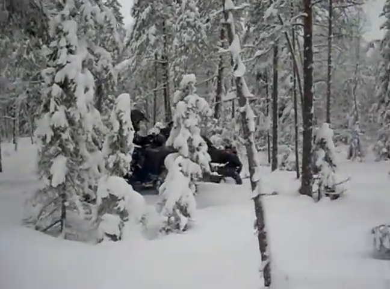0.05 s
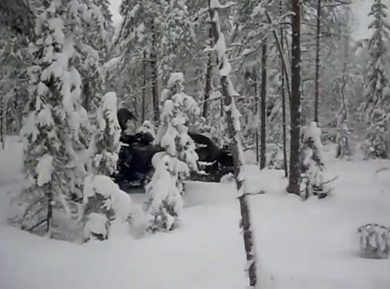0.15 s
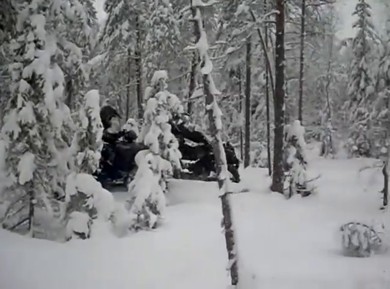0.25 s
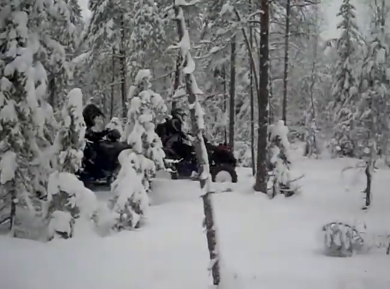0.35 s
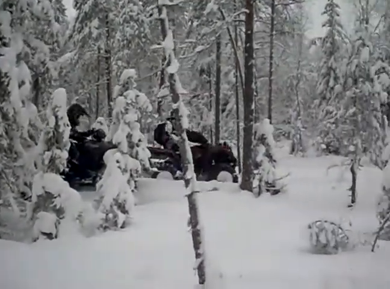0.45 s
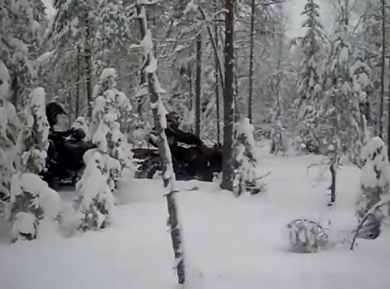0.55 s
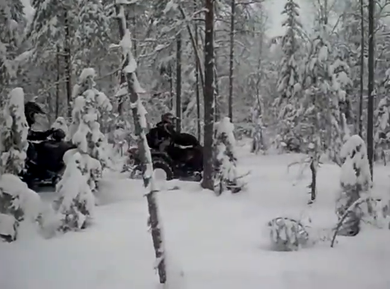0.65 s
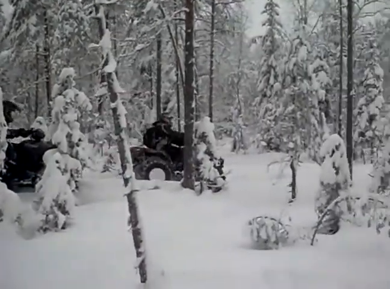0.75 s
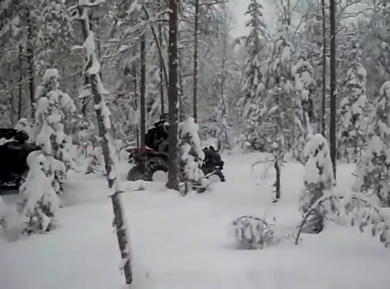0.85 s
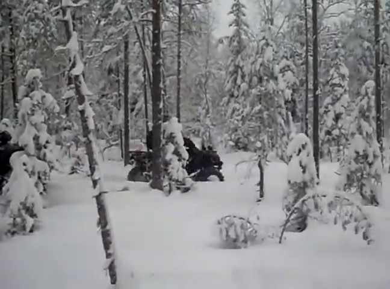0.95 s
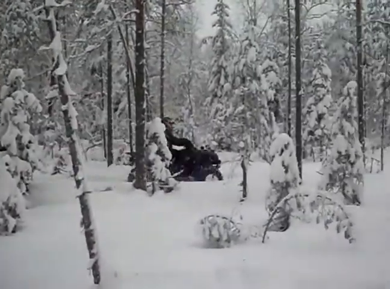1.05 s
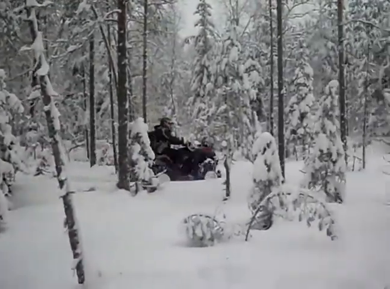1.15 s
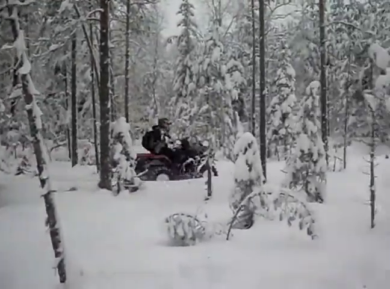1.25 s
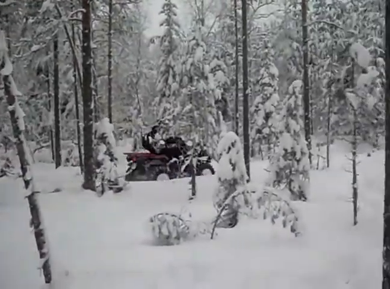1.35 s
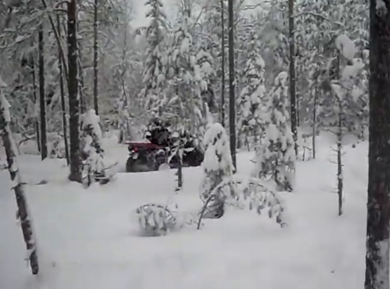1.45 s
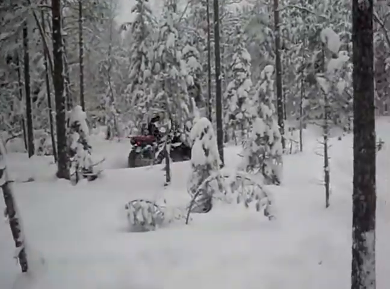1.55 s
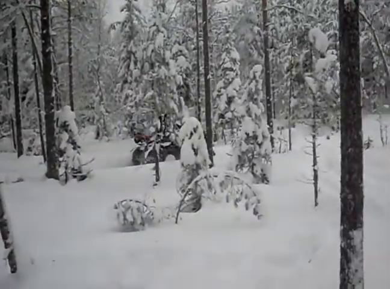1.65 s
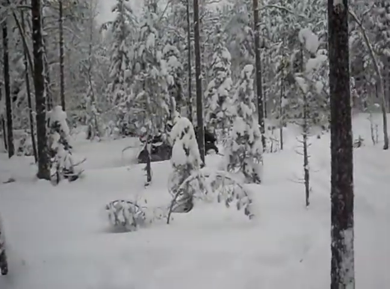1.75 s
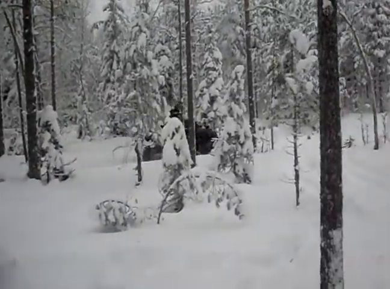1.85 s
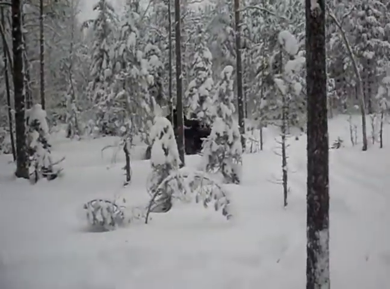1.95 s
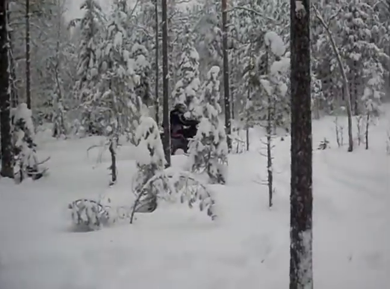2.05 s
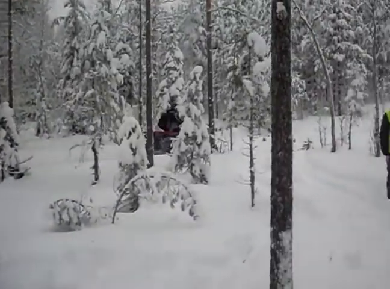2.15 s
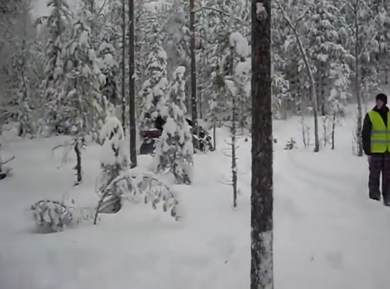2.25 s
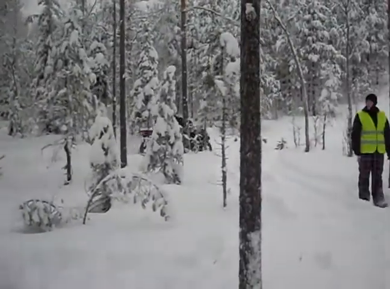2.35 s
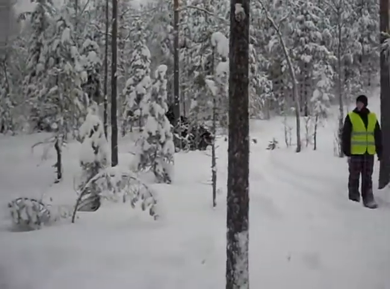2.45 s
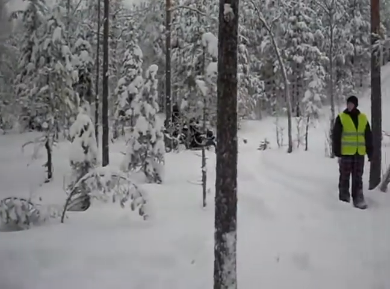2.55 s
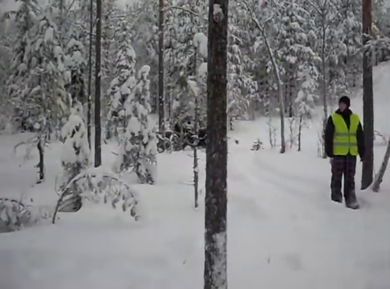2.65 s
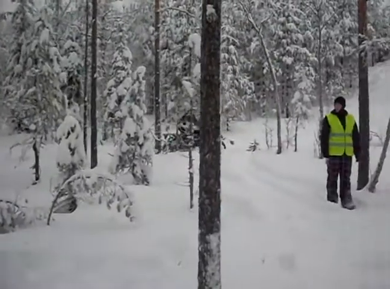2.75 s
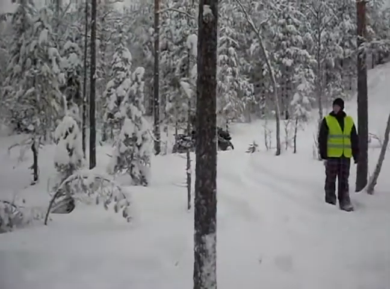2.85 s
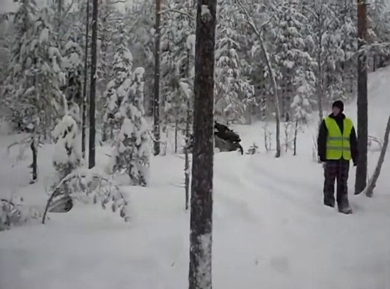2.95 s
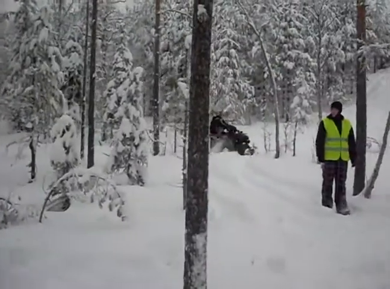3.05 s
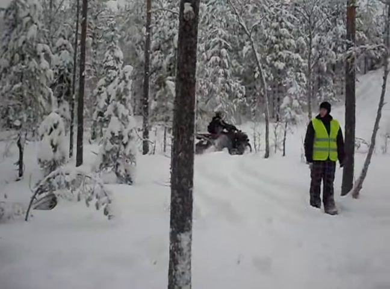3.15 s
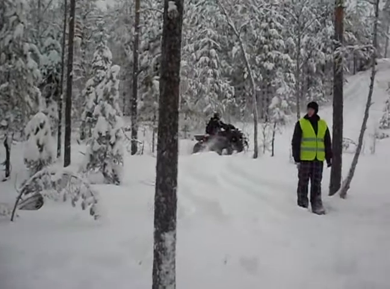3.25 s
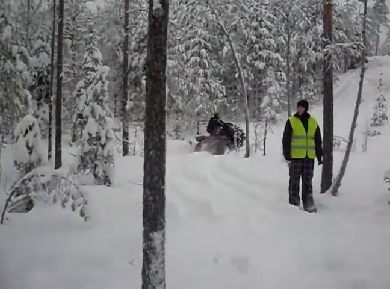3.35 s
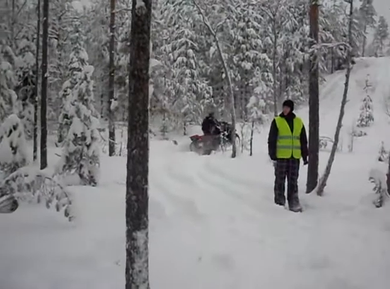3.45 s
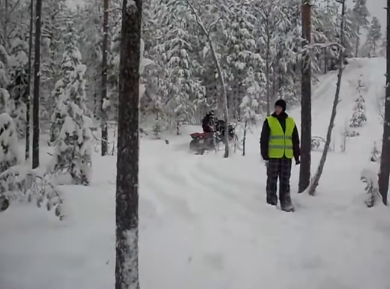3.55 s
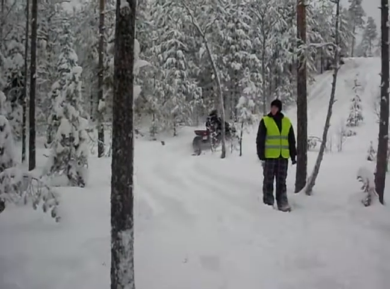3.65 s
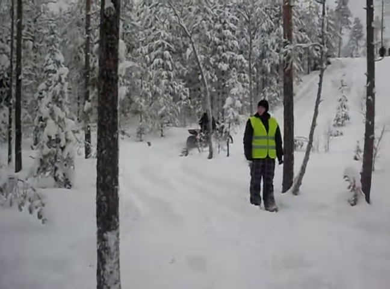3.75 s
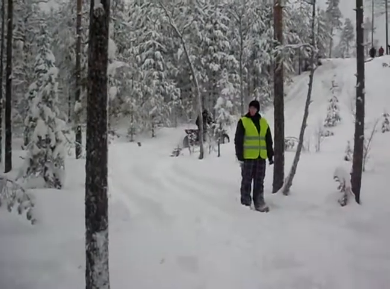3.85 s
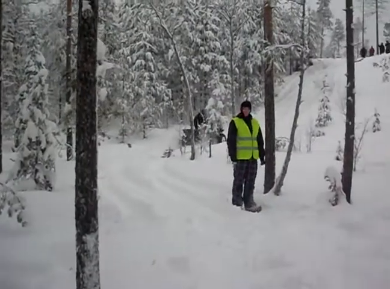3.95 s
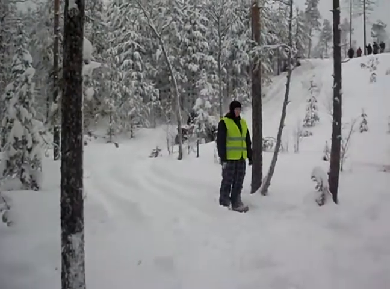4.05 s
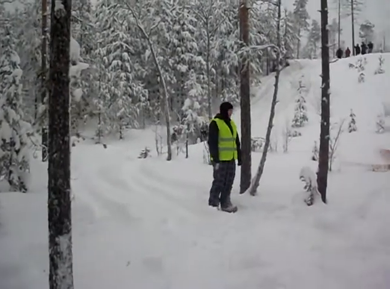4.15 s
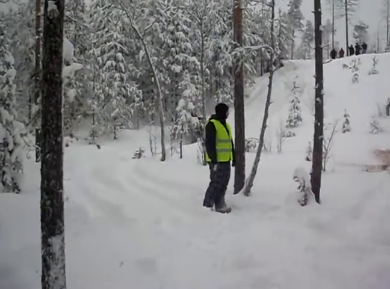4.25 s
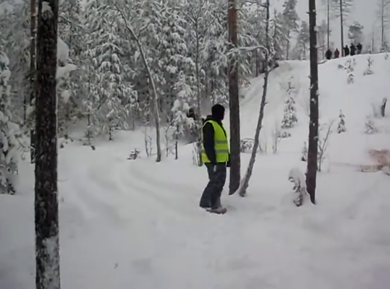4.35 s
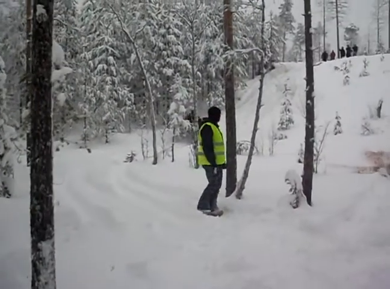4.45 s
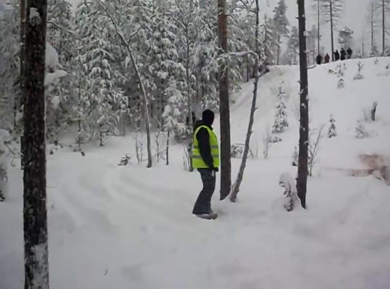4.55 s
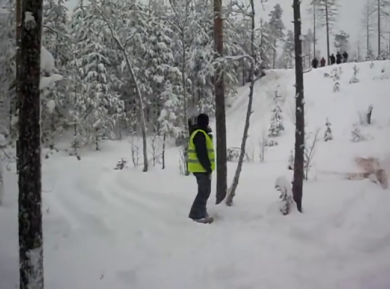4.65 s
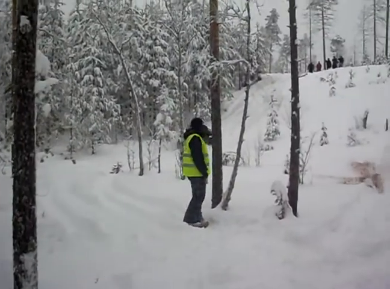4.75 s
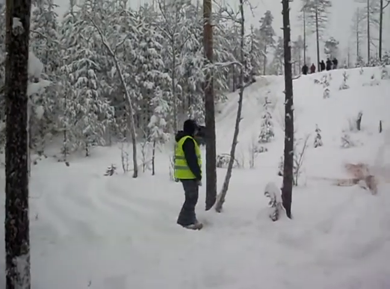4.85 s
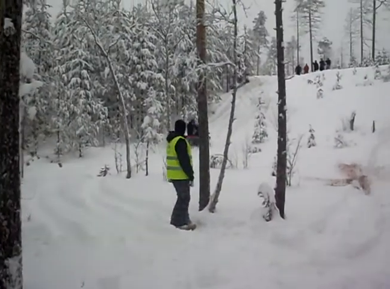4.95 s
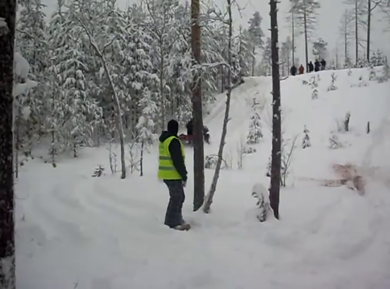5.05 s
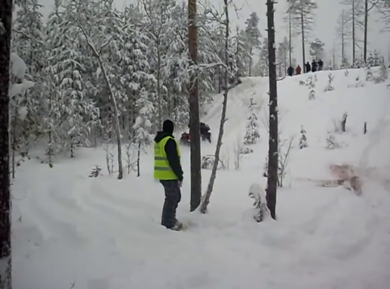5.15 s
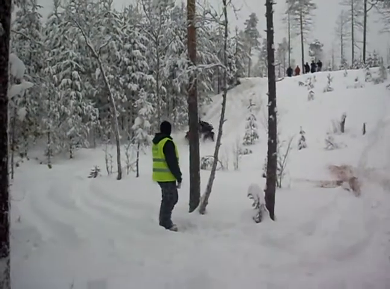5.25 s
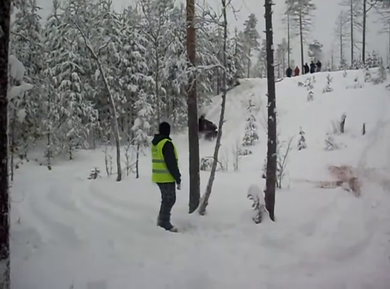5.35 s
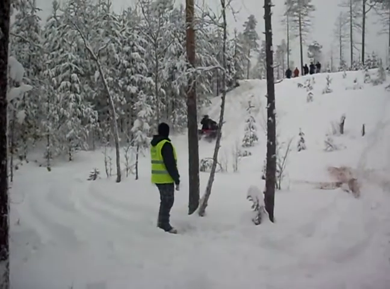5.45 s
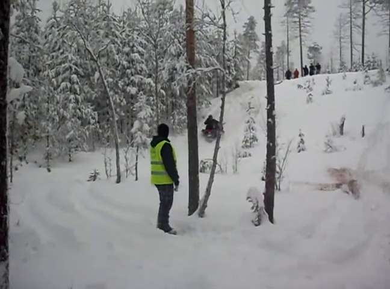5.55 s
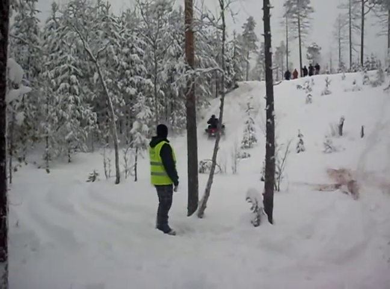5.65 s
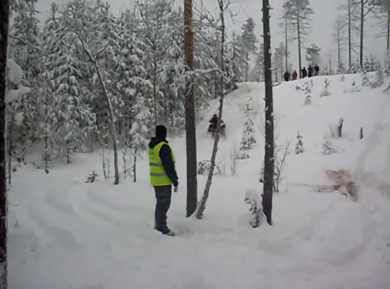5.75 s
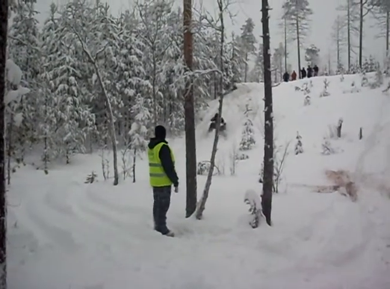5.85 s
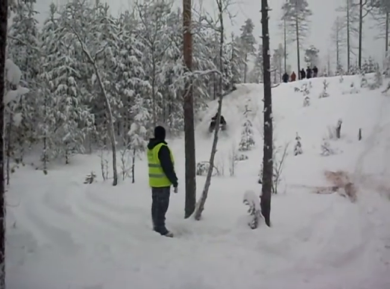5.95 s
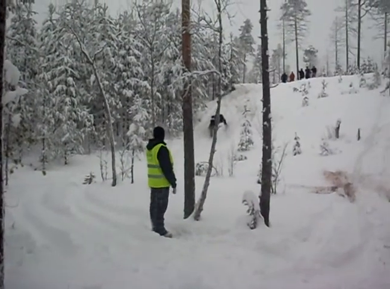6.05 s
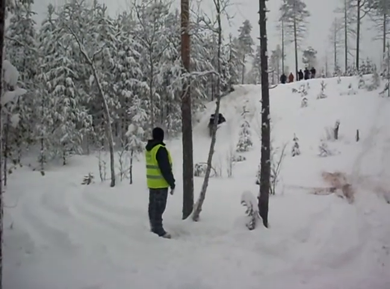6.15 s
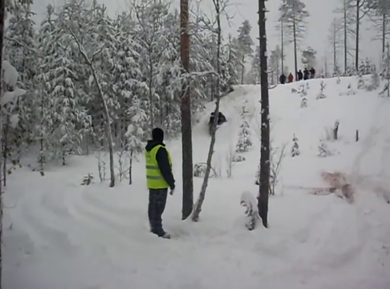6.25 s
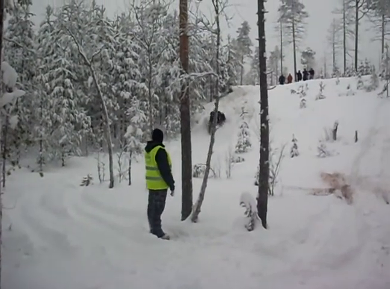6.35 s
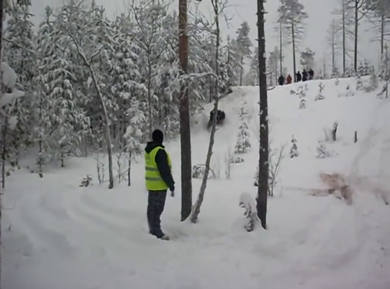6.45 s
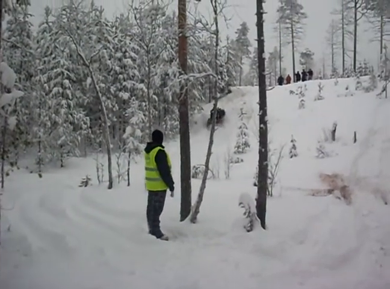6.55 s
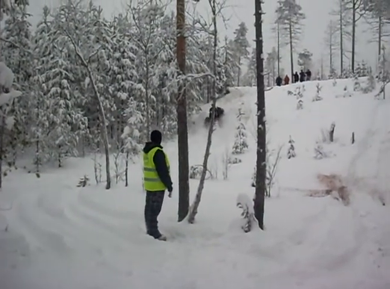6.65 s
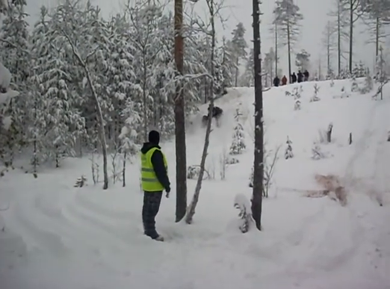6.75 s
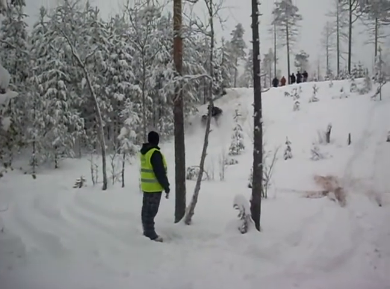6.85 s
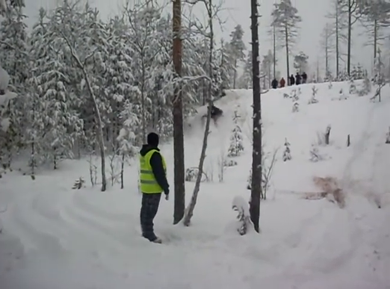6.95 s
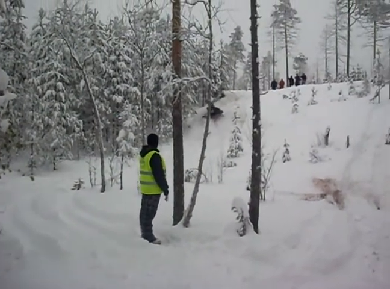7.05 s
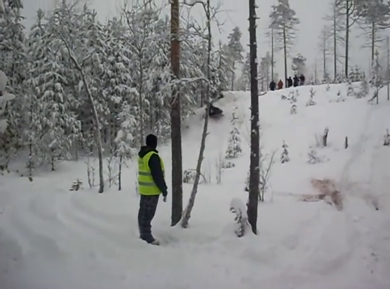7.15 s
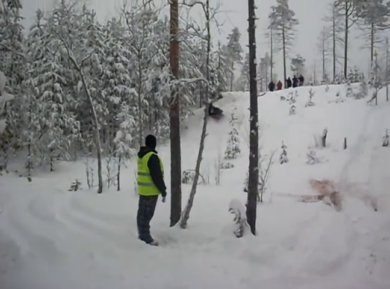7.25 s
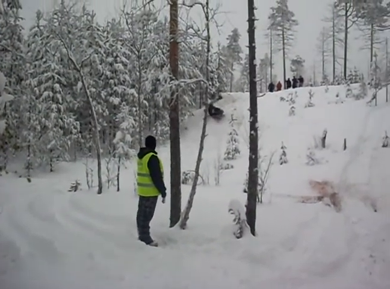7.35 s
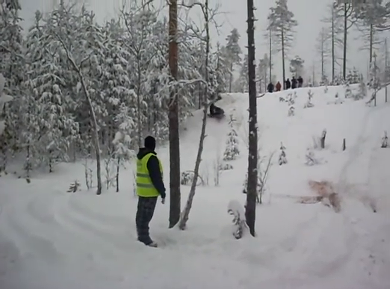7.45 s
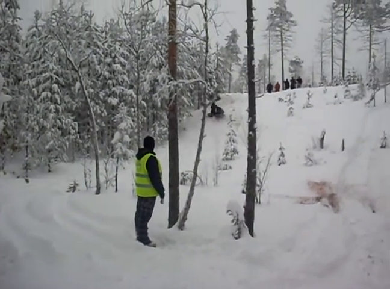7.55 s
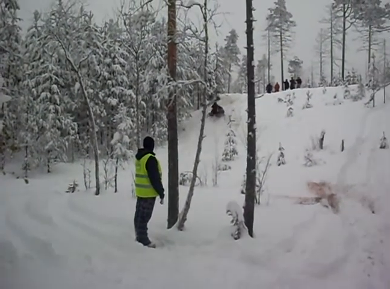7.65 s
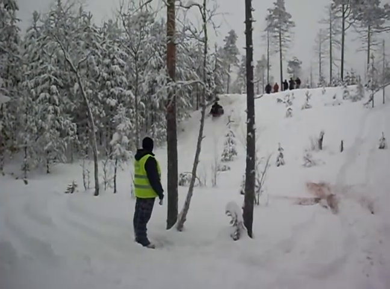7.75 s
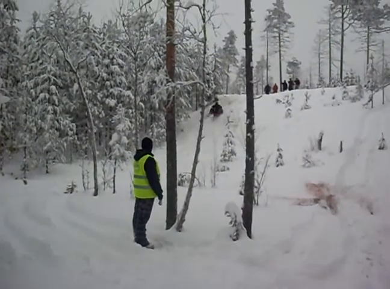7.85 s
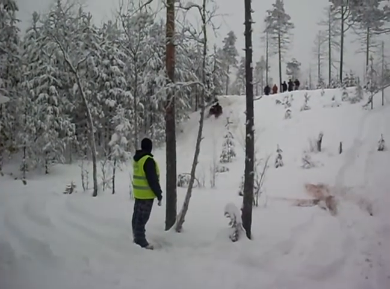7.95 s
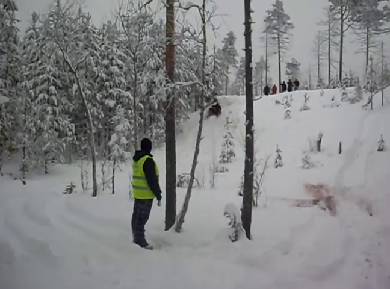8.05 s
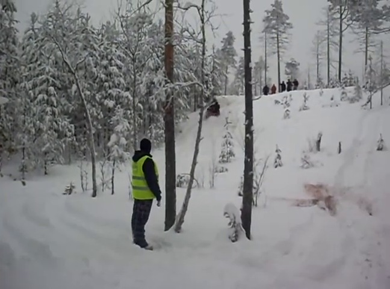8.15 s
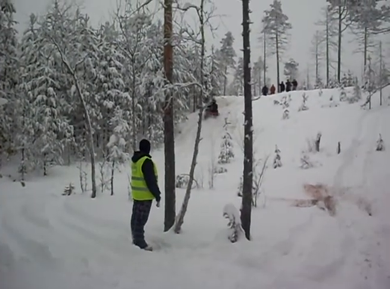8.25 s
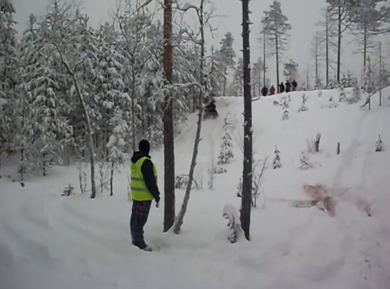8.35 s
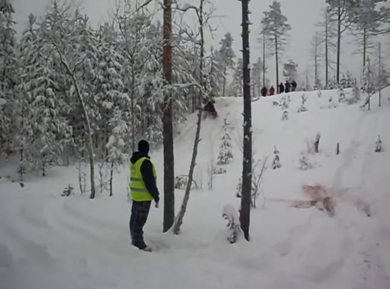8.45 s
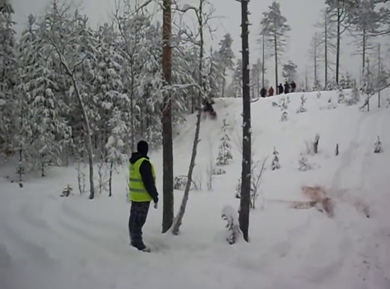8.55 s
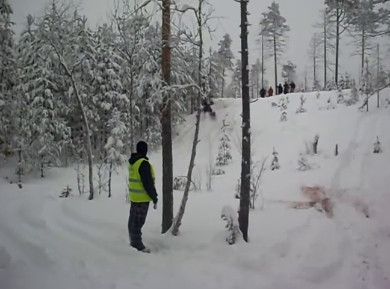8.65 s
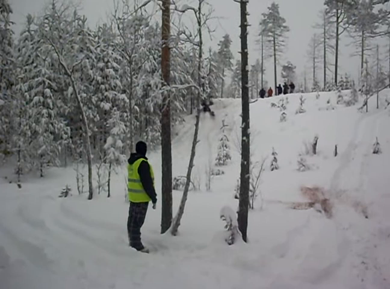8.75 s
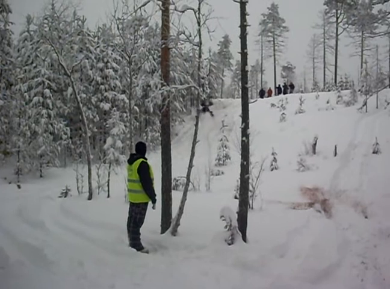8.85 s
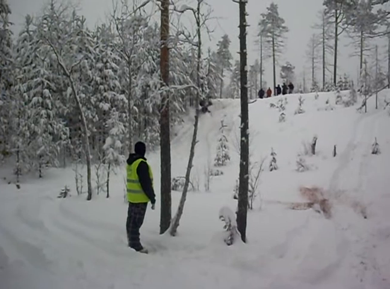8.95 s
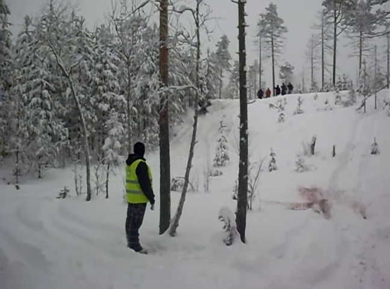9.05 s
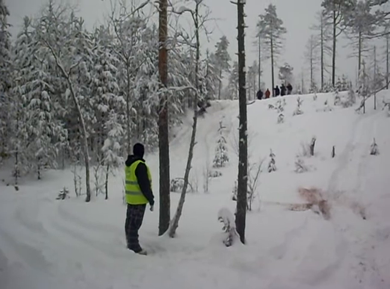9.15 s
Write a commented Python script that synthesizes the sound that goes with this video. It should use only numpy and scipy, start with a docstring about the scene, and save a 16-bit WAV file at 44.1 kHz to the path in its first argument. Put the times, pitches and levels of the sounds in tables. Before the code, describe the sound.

A quad bike churns through snow with a low, hollow note, then opens to full throttle and climbs, rasping and snarling.

```python
"""First comes the low, hollow note of a V-twin quad bike churning through deep snow in a forest.
It turns away from the microphone and climbs a hill on full throttle, rasping and snarling.
Its two cylinders fire in close pairs; the revs hunt as the wheels slip; the slope mirrors the exhaust.
Behind it another quad idles among the trees, a third drones far off, and bright ticks cut through."""
import sys
import numpy as np
from scipy import signal
from scipy.fft import rfft, irfft, next_fast_len
from scipy.io import wavfile
from scipy.ndimage import uniform_filter1d, map_coordinates

SR = 44100
rng = np.random.default_rng(int(sys.argv[2]) if len(sys.argv) > 2 else 0)


def unload_audio(sound):
    """Save the sound as a 16-bit wav file, at the path given as the first command line argument."""
    columns = np.transpose(np.atleast_2d(sound))
    # keep every value between -1 and 1, then stretch to whole-number steps
    steps = np.round(np.clip(columns, -1, 1) * 32767)
    wavfile.write(sys.argv[1], SR, steps.astype(np.int16))


N = 406150
TIME = np.arange(N) / SR
KICK_S, OPEN_S, CRUISE_THROTTLE = 4.418, .06, .15  # the throttle snaps open: when, how fast, from where
CLIMB_S = np.maximum(TIME - KICK_S, 0)
THROTTLE = 1 - (1 - CRUISE_THROTTLE) * np.exp(-CLIMB_S / OPEN_S)
SPIT = (1 - np.exp(-CLIMB_S / .008)) * np.exp(-CLIMB_S / .085)  # it spits before the revs follow


def amp(db):
    """Decibels to amplitude."""
    return 10 ** (np.asarray(db) / 20)


def unit(x):
    """Scale to rms 1."""
    return x / np.sqrt(np.mean(x ** 2) + 1e-20)


def steady(x, size=4400):
    """Hold the running rms at 1."""
    return x / np.sqrt(np.abs(uniform_filter1d(uniform_filter1d(x ** 2, size), size)) + 1e-20)


def curves(rows):
    """One value per sample for each column after the time."""
    s, *cols = np.transpose(rows)
    return [np.interp(TIME, s, c) for c in cols]


def swells(rows):
    """Sum of smooth bumps, one for each (time [s], height, half length [s]) row."""
    return sum(height * np.exp(-((TIME - s) / half) ** 2) for s, height, half in rows)


def wobble(rate):
    """A smooth random curve, rate knots a second."""
    return map_coordinates(rng.standard_normal(int(N * rate / SR) + 4), [TIME * rate])


def colour(x, points, size=8192):
    """Causal filter through the (frequency [Hz], gain [dB]) points."""
    f, db = np.transpose(points)
    gain = amp(np.interp(np.log(np.fft.rfftfreq(size, 1 / SR) + 1), np.log(f), db))
    cepstrum = irfft(np.log(gain))
    cepstrum[1:size // 2] *= 2
    cepstrum[size // 2 + 1:] = 0
    return signal.oaconvolve(x, irfft(np.exp(rfft(cepstrum))))[:N]


def below(x, hz, order=8):
    """Low-pass without phase shift."""
    m = next_fast_len(N + 8192)
    return irfft(rfft(x, m) / (1 + (np.fft.rfftfreq(m, 1 / SR) / hz) ** order), m)[:N]


def delayed(x, ms):
    """x heard ms later; ms may move."""
    return np.interp(TIME - ms / 1000, TIME, x, left=0)


def firings(cycles, scatter_db, jitter_s):
    """One impulse at each whole cycle, uneven in size and time."""
    when = np.interp(np.arange(np.ceil(cycles[0]), cycles[-1]), cycles, TIME)
    chance = rng.standard_normal((len(when), 2))
    at = np.clip(np.round((when + jitter_s * chance[:, 0]) * SR), 0, N - 1).astype(int)
    return np.bincount(at, amp(scatter_db * chance[:, 1]), N)


def puffs(pulses, decay_s, rise_s, between, size=1500):
    """Noise that flares at each pulse and dies away to a steady share."""
    t = np.arange(size) / SR
    shape = np.exp(-t / decay_s) * (1 - np.exp(-(t / rise_s) ** 2))
    return (signal.oaconvolve(pulses, shape / shape.max())[:N] + between) * rng.standard_normal(N)


# the air among the trees: (frequency [Hz], gain [dB])
AIR_SPECTRUM = [(20, -2), (100, -5), (300, -8), (650, -3.5), (1300, -6), (2300, -7.5), (4500, -22),
                (10000, -30), (12000, -58)]

def forest_air():
    """A soft, nearly even rush all round the microphone."""
    return amp(-44.3 + .2 * wobble(3.9)) * unit(colour(rng.standard_normal(N), AIR_SPECTRUM))


def far_quad():
    """Far off, an engine's wavering drone comes into earshot after the first second."""
    pitch_hz = 123 + 3 * wobble(6.2)
    drone = np.sin(2 * np.pi * np.cumsum(pitch_hz) / SR) * amp(3 * wobble(7))
    return amp(-53) * unit(drone) * np.clip(TIME - 1, 0, 1)


# one idling exhaust thump: (frequency [Hz], gain [dB])
IDLE_THUMP = [(20, -26), (45, 4), (70, -1), (115, 9), (180, -9.5), (300, -8.5), (800, -50), (3000, -50)]

def idling_quad():
    """Among the trees, a waiting engine fires in dull, uneven thumps."""
    firing_hz = 24 + .8 * wobble(3)
    thumps = firings(np.cumsum(firing_hz) / SR, scatter_db=3, jitter_s=.0021)
    return amp(-49.5) * unit(colour(thumps, IDLE_THUMP))


# sharp ticks: (time [s], relative level [dB])
TICK_EVENTS = [(6.1467, -9), (6.3071, -18), (7.416, -3), (8.335, -14), (9.1696, -12)]

def ticks(size=900):
    """Brief noise bursts, as of twigs snapping, as bright as the exhaust's hiss."""
    out, t = np.zeros(N + size), np.arange(size) / SR
    for s, db in TICK_EVENTS:
        out[round(s * SR):][:size] += amp(db - 20.5) * np.exp(-t / .002) * rng.standard_normal(size)
    return colour(out[:N], HISS_SPECTRUM)


def forest_echo(x, t60, size=22050):
    """Snowy trunks scatter a short, dull echo back to the microphone."""
    t = np.arange(size) / SR
    tail = rng.standard_normal(size) * amp(-60 * t / t60) * (1 - np.exp(-t / .045))
    return below(signal.fftconvolve(x, tail / np.linalg.norm(tail))[:N], hz=4300, order=2)


def scattered(pulses, decay_s, rate, count=4, size=500):
    """Each pulse returns as a dense cluster that changes slowly as the quad moves among the trunks."""
    clusters = rng.standard_normal((count, size)) * np.exp(-np.arange(size) / SR / decay_s)
    return sum(wobble(rate) * signal.oaconvolve(pulses, cluster)[:N] for cluster in clusters)


# the reflection off the snow: (time [s], delay [ms], strength [0-1])
SLOPE_ECHO = [(4.5, .15, .08), (5.3, .22, .12), (5.9, .42, .28), (6.5, .475, .48), (6.78, .545, .6),
              (7.0, .65, .55), (7.5, .74, .48), (8.0, .8, .22), (8.6, .85, .06)]

def mirrored(x):
    """Add the slope's echo: inverted, dulled, and later as the quad gains height."""
    delay_ms, strength = curves(SLOPE_ECHO)
    return x - strength * delayed(below(x, hz=5140), delay_ms)


# cruising, then full throttle: (time [s], revs [cycles/s])
DRIVEN_REVS = [(-0.0, 41.35), (0.8, 39.58), (1.18, 41.39), (1.67, 39.45), (2.29, 39.84), (2.78, 42.34),
               (3.03, 41.51), (3.41, 43.41), (4.3, 42.05), (4.764, 56.3), (5.56, 55.97), (6.38, 55.51),
               (7.31, 57.63), (7.66, 55.39), (8.35, 55.08), (9.21, 55.13)]
# wheels spin or dig in: (time [s], change [cycles/s], half length [s])
WHEEL_SLIPS = [(0.538, 2.316, 0.179), (4.135, 2.1, 0.075), (5.653, 2.043, 0.102), (6.549, -0.963, 0.091),
               (6.924, 1.105, 0.046), (7.181, -2.505, 0.126), (7.822, -2.064, 0.063), (8.47, 2.655, 0.032),
               (8.582, -4.427, 0.082), (9.009, -1.896, 0.085)]
# rocking in the ruts: (time [s], depth [cycles/s], swing rate [Hz], half length [s])
RUT_SWINGS = [(0.34, 0.64, 5.18, 0.27), (3.42, .7, 5.5, .13), (3.83, 1.59, 6.72, 0.21),
              (4.21, -.9, 5.5, .12), (4.535, -1.8, 9.5, .06), (5.0, 1.04, 6.21, 0.21), (5.28, .6, 7, .1),
              (5.96, 0.81, 4.97, 0.32), (6.49, 1.33, 4.17, 0.19), (8.02, -.4, 6, .12), (8.3, -1, 6.5, .1),
              (8.86, 1.08, 7.38, 0.32)]

def revs():
    """Engine cycles per second: the driver's setting, plus wheel slips and rocking."""
    rocking = sum(swells([(s, depth, half)]) * np.cos(2 * np.pi * hz * (TIME - s))
                  for s, depth, hz, half in RUT_SWINGS)
    return curves(DRIVEN_REVS)[0] + swells(WHEEL_SLIPS) + rocking


# the transmission, heard between trunks: (time [s], multiple of the revs, level [dB], half length [s])
GEAR_TONES = [(.72, 44, -53.5, .18), (1.3, 39.5, -54.5, .2), (1.62, 58.3, -54, .23), (1.7, 41, -55, .15),
              (2.15, 40.5, -55.5, .2), (2.88, 58.6, -57.5, .2)]

def gear_whine(speed, play_cycles=.15):
    """Gear tones that follow the revs, smeared by play in the teeth."""
    cycles = np.cumsum(speed) / SR
    tone = lambda multiple: unit(np.sin(2 * np.pi * (multiple * cycles + play_cycles * wobble(70))))
    return sum(swells([(s, amp(db), half)]) * tone(multiple) for s, multiple, db, half in GEAR_TONES)


# the gas jet: (frequency [Hz], gain [dB])
HISS_SPECTRUM = [(2000, -10), (3800, 7.5), (5000, 4.5), (7000, 2), (10000, 0), (11000, -4.5), (12000, -33)]

def gas_hiss(blasts, lift_db, load_db=10.5, fade_db_per_s=.8):
    """Each blast hisses from the pipe, louder under load and fainter up the hill."""
    jet = puffs(blasts, decay_s=.0014, rise_s=.00096, between=.42)
    level_db = -55.5 + load_db * THROTTLE - fade_db_per_s * CLIMB_S + lift_db + 16 * SPIT
    return amp(level_db + 1.16 * wobble(14)) * steady(mirrored(colour(jet, HISS_SPECTRUM)))


# turbulent gas behind each pulse: (frequency [Hz], gain [dB])
RASP_SPECTRUM = [(500, -55), (1100, -1.5), (1350, 1), (1560, -1.5), (1800, 1.5), (2030, -3), (2300, 2.5),
                 (2660, -7), (2950, -4), (3400, -10.5), (4200, -16), (6000, -38)]
# the tailpipe's resonance: (frequency [Hz], gain [dB])
TAILPIPE_BAND = [(2450, -30), (2800, -3), (3050, 0), (3300, -9), (3900, -34)]
# its snarls at the peaks of load: (time [s], level [dB], half length [s])
TAILPIPE_SNARLS = [(4.95, -37, .15), (5.27, -38, .08), (6.72, -37, .14), (7.45, -40, .12)]

def gas_rasp(blasts, pulses, lift_db, load_db=20.2, fade_db_per_s=1.85):
    """Turbulent puffs and their scatter off the trunks rasp, and set the tailpipe snarling."""
    gas = unit(puffs(blasts, decay_s=.0012, rise_s=.0007, between=.12))
    cluster = scattered(pulses, decay_s=.0042, rate=4)
    churn = .35 * (1 - THROTTLE) * rng.standard_normal(N)  # wash of tyres and engine while cruising
    grit = .7 * steady(colour(gas + churn, RASP_SPECTRUM)) + .75 * steady(colour(cluster, RASP_SPECTRUM))
    level_db = -52.5 + load_db * THROTTLE - fade_db_per_s * CLIMB_S + lift_db + 12 * SPIT
    snarls = swells([(s, amp(db), half) for s, db, half in TAILPIPE_SNARLS])
    return amp(level_db) * steady(mirrored(grit)) + snarls * steady(colour(grit, TAILPIPE_BAND))


# the load surges, and the rasp and hiss dip now and then: (time [s], extra rasp [dB], extra hiss [dB], half
# length [s])
LOAD_SURGES = [(.9, 3.8, 1, .8), (4.1, 10.5, 4, .19), (4.62, -2, 0, .08), (4.95, 4.5, 0, .08),
               (5.27, 2.5, 0, .08), (5.35, 3.5, 1, .025), (5.55, 2, 3, .25), (5.65, 3, 1, .03),
               (6.0, -1.5, -3, .15), (6.17, 2, 1, .03), (6.29, 2, 0, .03), (6.74, 5, 5.5, .17),
               (7.4, 3.8, 4, .4), (7.42, 2.5, 1, .03), (8.1, 3.5, 0, .06), (8.22, -2, -4.5, .12),
               (8.48, 2.5, 0, .1), (8.94, 7, 2, .045), (9.15, 6.5, 2, .06)]

def gas_noise(front_cycles, rear_cycles, front, rear):
    """Gas blasts vary from stroke to stroke; under load the rear cylinder blows the harder."""
    rear_share = .41 + 1.22 * THROTTLE
    blasts = firings(front_cycles, scatter_db=1.8, jitter_s=.0001)
    blasts += rear_share * firings(rear_cycles, scatter_db=3, jitter_s=.0001)
    fade_in_db = -24 * np.exp(-TIME / .24)  # the rasp and hiss fade in over the first half second
    rasp_db = swells([(s, db, half) for s, db, _, half in LOAD_SURGES]) + fade_in_db
    hiss_db = swells([(s, db, half) for s, _, db, half in LOAD_SURGES]) + fade_in_db
    return gas_rasp(blasts, front + rear_share * rear, rasp_db) + gas_hiss(blasts, hiss_db)


def engine_orders(speed, cycles, pipe_hz=138, pipe_width_hz=12):
    """Both cylinders push in step on the third order, lifted as it crosses the pipe's resonance."""
    pipe_db = 16 * np.exp(-((3 * speed - pipe_hz) / pipe_width_hz) ** 2) * (1 - THROTTLE / 2)
    third = -amp(-55.5 + 9 * THROTTLE + pipe_db) * np.cos(6 * np.pi * cycles)
    # the fourth order booms as the quad turns for the hill
    fourth = swells([(4.0, amp(-45.5), .5)]) * (1 - THROTTLE) * np.sin(8 * np.pi * cycles)
    return third + fourth


# each cylinder's exhaust pulse, cruising and climbing: (frequency [Hz], gain [dB])
FRONT_CRUISE_PULSE = [(30, -10), (90, 18), (200, 3.5), (243, 8), (290, -6.5), (380, 0), (520, 12),
                      (630, 16.5), (720, 12.5), (840, 6.5), (1020, 16), (1220, 7.5), (1380, -3), (1600, 7),
                      (2300, -15), (8000, -54)]
REAR_CRUISE_PULSE = [(30, 6.5), (90, -10), (200, 2), (243, 13.5), (300, 2.5), (430, 14), (640, 7.5),
                     (850, -2.5), (1050, 5.5), (1400, -10.5), (2300, -8.5), (8000, -52)]
FRONT_CLIMB_PULSE = [(30, -1.5), (60, 4), (170, 11.5), (280, -1.5), (400, 5), (580, 18.5), (720, 17.5),
                     (880, 9.5), (1050, 14.5), (1350, 9.5), (1560, 2), (1850, 3), (2300, 0.5), (3600, -9),
                     (8000, -67)]
REAR_CLIMB_PULSE = [(30, -1.5), (60, 6.5), (170, 8), (270, 12), (400, 20), (580, 23.5), (800, 19),
                    (980, 21.5), (1150, 15.5), (1360, 13.5), (1600, 5), (2300, -11.5), (3600, -31.5),
                    (8000, -35)]

def exhaust_pulses(front, rear):
    """Pressure pulses change shape with the throttle; most return once, dulled, along the pipe."""
    returning = lambda x, ms, share: x + share * below(delayed(x, ms), hz=1180, order=2)
    cruise = returning(colour(front, FRONT_CRUISE_PULSE), ms=1.7, share=.2)
    cruise += returning(colour(rear, REAR_CRUISE_PULSE), ms=5.04, share=.29)
    climb = colour(front, FRONT_CLIMB_PULSE)
    climb += returning(colour(rear, REAR_CLIMB_PULSE), ms=5.49, share=.061)
    return -(1 - THROTTLE) * unit(cruise) - THROTTLE * unit(climb)


# the silencer's boom: (time [s], level [dB])
SILENCER_BOOM = [(0, -42), (1.3, -38.5), (2.8, -44.5), (4.3, -50), (4.6, -45), (5.9, -43.5), (6.35, -51),
                 (6.8, -45), (7.8, -41.5), (9.21, -45.5)]
# the hollow low-middle tone within the note: (time [s], gain [dB])
HOLLOW_TONE = [(0, 11), (.65, -1), (2.1, 2), (3.2, -4), (4.47, 2), (5.3, -1.5), (7.2, -2), (8.2, 2)]
# the exhaust note at the microphone: (time [s], level [dB], brightness [dB])
EXHAUST_NOTE = [(0, -37.5, -25), (.28, -39, -19), (.45, -36, -14), (.6, -39.7, -5), (.75, -39.5, -2.5),
                (1.0, -35.8, -.7), (1.45, -39, -1.2), (2.05, -39, -1.7), (2.8, -40.3, -7.5),
                (3.4, -39.3, -7), (3.7, -40.3, -6.5), (4.38, -36.5, -10), (4.47, -29.3, -5),
                (4.55, -29.3, -1.5), (4.61, -26.5, -.7), (5.0, -26.3, 4), (5.19, -27.6, 4),
                (5.55, -23, -.6), (5.95, -24.2, -2.7), (6.17, -26.2, -1.2), (6.5, -23.6, -2.2),
                (6.7, -23.6, -.3), (6.83, -20.8, -1.8), (7.05, -19.7, -4), (7.43, -21, -3.2),
                (8.1, -23.7, -5.2), (8.18, -25, -6.5), (8.43, -22.6, -6.5), (8.65, -24.3, -5.8),
                (9.21, -24.8, -5.3)]

def exhaust_voice(exhaust, fade_db_per_s=1.8):
    """The exhaust's bands rise and fall as the quad turns and passes behind trees."""
    boom_db, = curves(SILENCER_BOOM)
    hollow_db, = curves(HOLLOW_TONE)
    note_db, bright_db = curves(EXHAUST_NOTE)
    band = lambda low_hz, high_hz: below(exhaust, high_hz, order=12) - below(exhaust, low_hz, order=12)
    throb_db = -45 + 7 * THROTTLE - fade_db_per_s * TIME  # fades as the quad draws away
    throb = amp(throb_db) * steady(below(exhaust, hz=103))
    boom = amp(boom_db) * steady(band(162, 299))
    note = amp(note_db) * steady(mirrored(amp(hollow_db) * band(344, 444) + band(511, 803)))
    edge_db = note_db + bright_db - 3.37 + .45 * wobble(16) + 3.5 * SPIT
    edge = amp(edge_db) * steady(mirrored(band(799, 9000)))
    return throb + boom + note + edge


def climbing_quad(hunt_cycles=.006):
    """The V-twin hunts at random; its rear cylinder fires about a third of a cycle after the front."""
    speed = revs()
    cycles = np.cumsum(speed) / SR + .745 + hunt_cycles * wobble(22)
    rear_cycles = cycles - .32 + .034 * THROTTLE
    front = firings(cycles, scatter_db=1.8, jitter_s=.00003)
    rear = firings(rear_cycles, scatter_db=.5, jitter_s=.00002)
    voice = exhaust_voice(exhaust_pulses(front, rear))
    gas = gas_noise(cycles, rear_cycles, front, rear)
    return voice + gas + engine_orders(speed, cycles) + gear_whine(speed)


def scene():
    """From one spot in the forest: the climbing quad and its echo, over the air and other engines."""
    quad = climbing_quad()
    air = forest_air()
    echo = amp(-15) * forest_echo(quad, t60=.4)
    return (air + idling_quad() + far_quad() + ticks() + echo + quad)[None]


def record(dry):
    """One microphone, with nothing kept above its band limit."""
    return below(dry[0], hz=12400, order=90)[None]


dry = scene()
out = record(dry)
unload_audio(out)
```